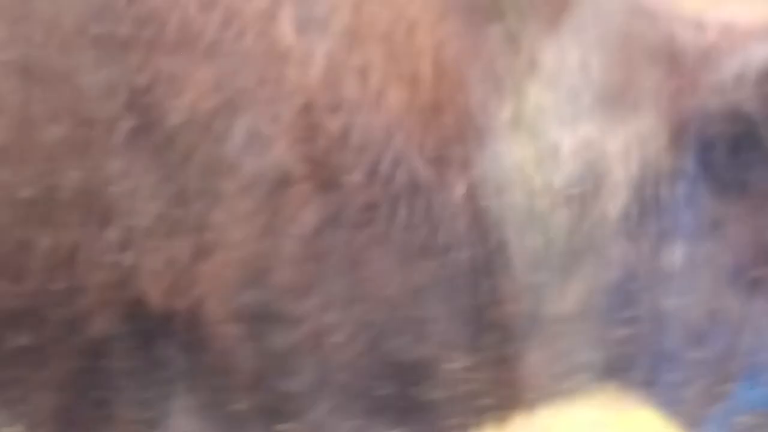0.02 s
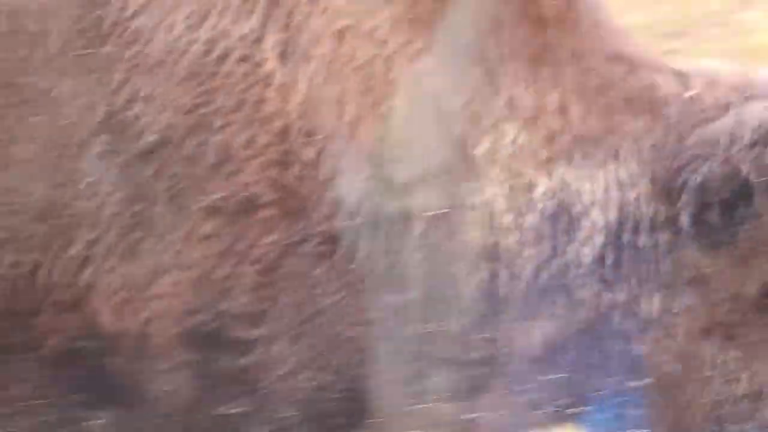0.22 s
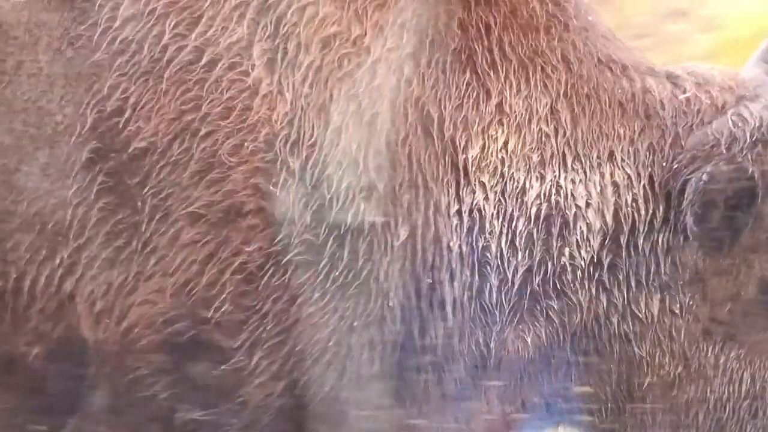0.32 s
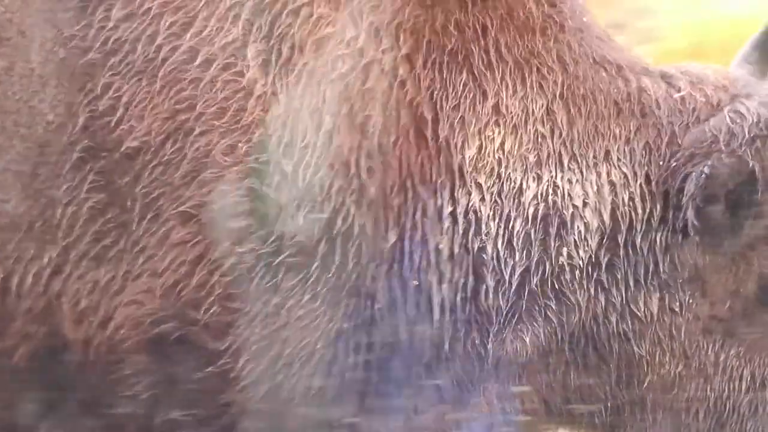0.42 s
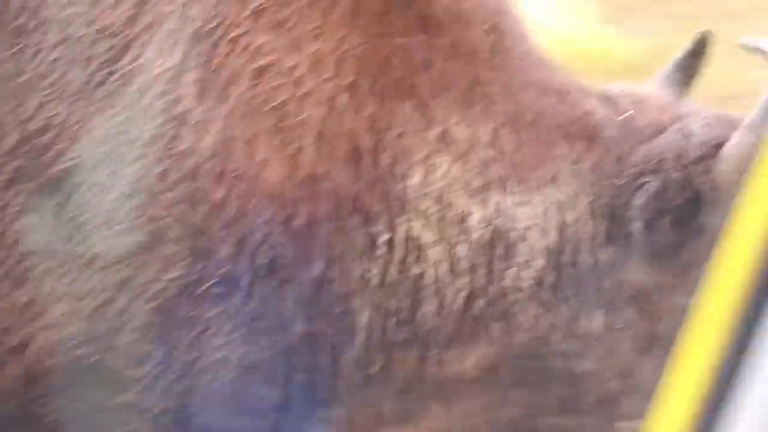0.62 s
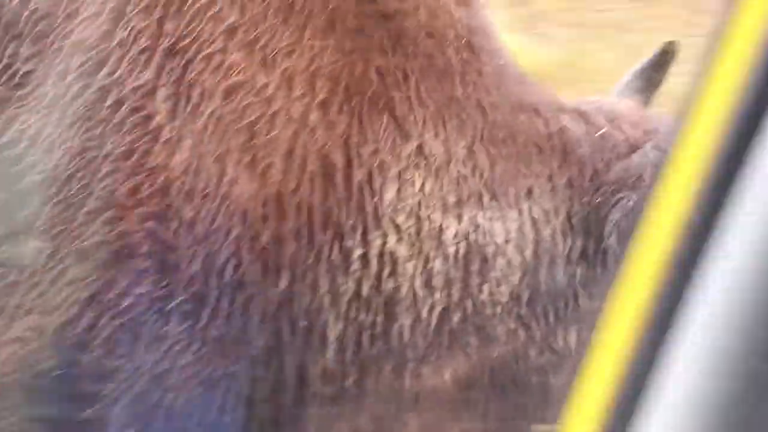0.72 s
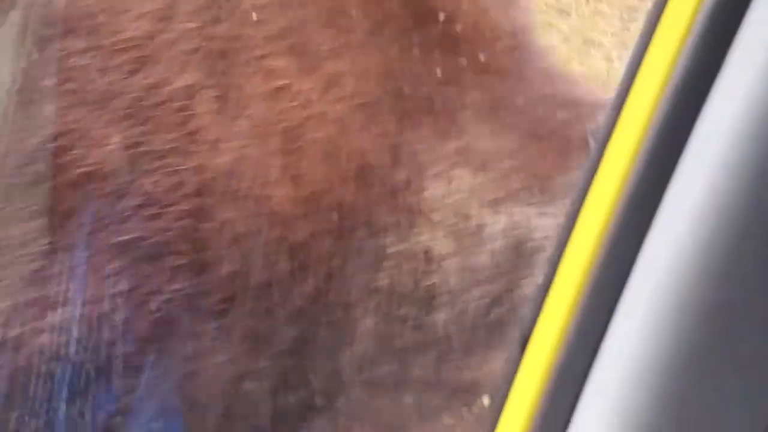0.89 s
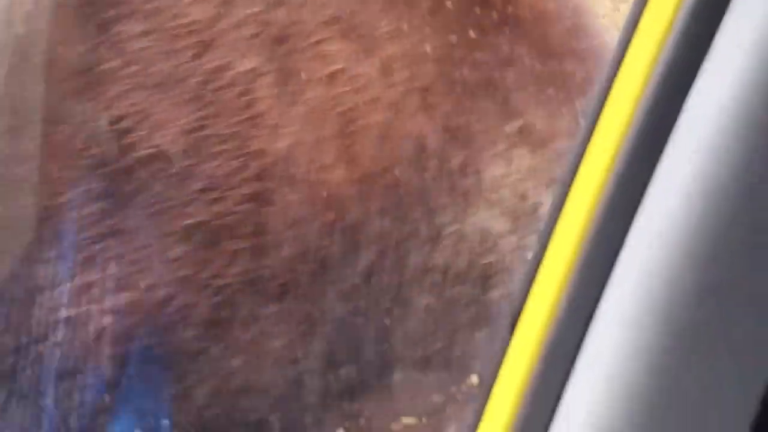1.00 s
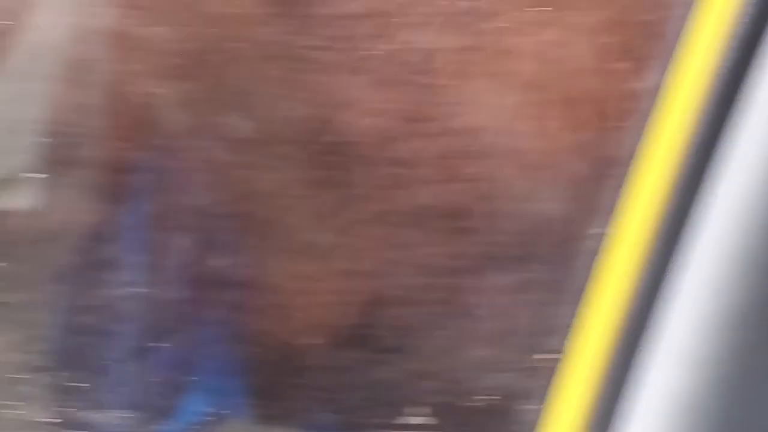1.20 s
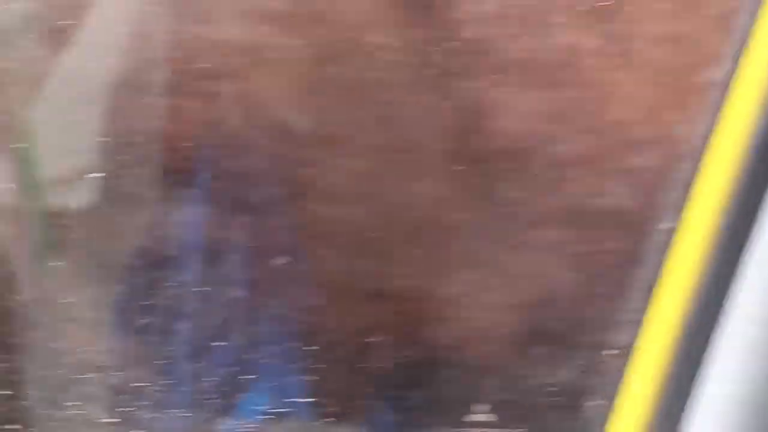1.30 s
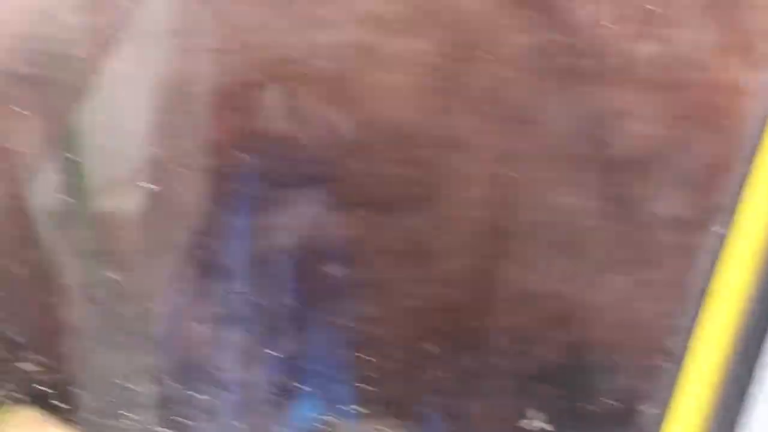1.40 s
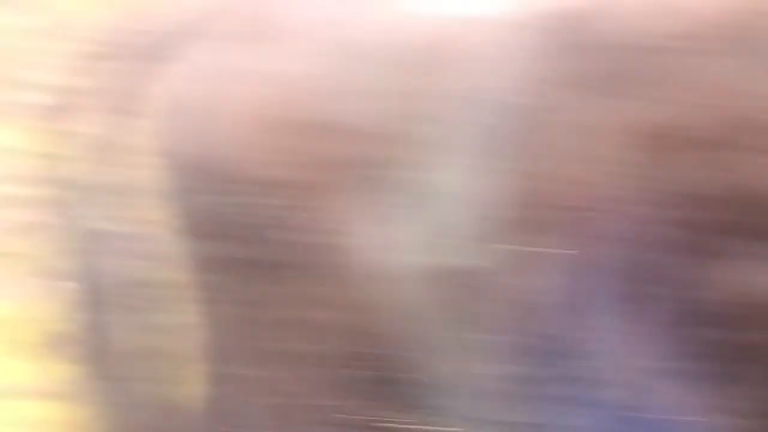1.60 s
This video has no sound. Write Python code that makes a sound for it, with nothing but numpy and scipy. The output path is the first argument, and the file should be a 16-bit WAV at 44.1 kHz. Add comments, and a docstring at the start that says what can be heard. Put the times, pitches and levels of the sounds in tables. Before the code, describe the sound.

A bison bumps a car door, heard close from inside the quiet cabin: a light knock with brief fur rubbing, then one hard, boomy thud with clacking trim and a quick rebound, fading into faint handling noise.

```python
"""A bison leans on a car door, close on the right of a stereo microphone in the cabin: one light bump, then
a hard one with a rebound. Struck panel modes, narrow cavity noise and a deep boom make each thud.
Bursts of coloured noise and struck modes make the fittings clack; slow modes leave the bodywork humming.
Before and between the bumps the coat rubs the panel as uneven noise. Behind lie trim scuffs,
dry ticks, soft handling thumps, quiet hiss, a thin whine and a rumble that swells and sinks."""
import sys
import numpy as np
from scipy import signal
from scipy.fft import rfft, irfft, next_fast_len
from scipy.io import wavfile
from scipy.ndimage import map_coordinates

SR = 44100
rng = np.random.default_rng(int(sys.argv[2]) if len(sys.argv) > 2 else 0)


def file_out(sig):
    """Save sig as 16-bit WAV at sys.argv[1]."""
    # one column per channel
    cols = np.atleast_2d(sig).T
    # limit, then scale
    lim = np.clip(cols, -1, 1)
    pcm = np.round(lim * 32767).astype(np.int16)
    wavfile.write(sys.argv[1], SR, pcm)


N = 74970

# Colour of the cabin hiss. Each row: frequency in Hz, relative level in dB.
HISS_COLOUR = [(120, -23), (270, -6), (400, -10.5), (580, -15), (780, -13.5), (1500, -13.5), (3200, -19),
               (5300, -19), (6600, -13.5), (8500, -21.5), (11000, -20.5), (16000, -20)]
# Colour of the low rumble. Each row: frequency in Hz, relative level in dB.
RUMBLE_COLOUR = [(20, -18), (45, 3.5), (70, 1), (110, -4), (170, -1.5), (260, -15.5), (500, -33.5),
                 (1500, -58)]
# Swell of the rumble as the car rocks. Each row: time in seconds, level in dB.
RUMBLE_SWELL = [(0, -63.5), (.3, -66), (.52, -44.5), (.75, -54), (1.1, -61.5), (1.7, -58.5)]
HISS_DB, HISS_ALIKE = -61, 0.13
WHINE_HZ, WHINE_HALF_WIDTH_HZ, WHINE_DB, WHINE_HAZE_DB = 14140, 70, -66.5, -73

# Short scuffs and creaks of trim. Each row: start in seconds, level in dB, t60 in seconds,
# left-over-right difference in dB.
TRIM_SCUFFS = [(0.087, -49.5, .04, 1.5), (.285, -53.5, .08, -3), (.358, -46.5, .2, 2), (.388, -37, .05, 14),
               (0.628, -49, 0.18, 0), (.709, -49, 0.066, -3), (0.719, -49, 0.112, 5), (.76, -56, .12, 5),
               (.898, -52.5, 0.059, 5)]
# Colour of the scuffs. Each row: frequency in Hz, relative level in dB.
TRIM_COLOUR = [(300, -12), (2500, -10), (4500, -8.5), (6000, -2.5), (7400, -3), (9000, -9), (16000, -19.5)]
# Dry handling ticks. Each row: start in seconds, level in dB, t60 in seconds, frequency in Hz above
# which the tick is dull.
HANDLING_TICKS = [(.0614, -51.5, 0.019, 1780), (0.5149, -53.5, 0.084, 2520), (.605, -50.5, 0.029, 5010),
                  (1.0434, -53.5, 0.0105, 800), (1.2283, -49, 0.0075, 1190), (1.575, -65, 0.14, 1980)]
# Soft handling thumps. Each row: start in seconds, level in dB, frequency in Hz.
HANDLING_THUMPS = [(0.056, -47, 187), (.688, -42.5, 269), (1.035, -46, 186), (1.582, -41.5, 156),
                   (1.678, -38.5, 91)]
TICK_LOW_HZ = 148  # ticks are thin below this
THUMP_ATTACK_S, THUMP_T60_S = 0.0047, 0.1

# Loudness of the coat on the door. Each row: time in seconds, level in dB.
RUB_LEVEL = [(0, -62), (.13, -64.5), (.16, -46.5), (.187, -43), (.2, -38.5), (.25, -34.5), (.29, -41.5),
             (.325, -38), (.355, -47), (.395, -44.5), (.45, -62), (.55, -75.5)]
# Colour of the coat on the door. Each row: frequency in Hz, relative level in dB.
COAT_COLOUR = [(40, -19.5), (130, 1.5), (200, -2), (290, -8), (390, -12.5), (480, 0), (570, -8.5),
               (700, -15), (900, -13), (1900, -17.5), (3000, -30), (6800, -31.5), (9000, -39), (16000, -45)]
RUB_SLIP_HZ, RUB_ROUGH_DB = 138.4, 1.5

# The contacts that make up the bumps. Each row: start in seconds, thud level in dB, panel pitch ratio,
# boom in dB, hollow tone in dB, low, mid and treble clack in dB, clack hold in seconds, clack t60 ratio.
CONTACTS = [(0.194, -30.5, .92, -68.5, -35.5, -41, -49, -60, .003, 0.42),
            (0.1998, -27, .92, -57.5, -40.5, -40, -47, -45, 0.0067, 0.37),
            (0.2285, -14.5, 0.94, -40.5, -20, -31.5, -25, -28.5, .006, 0.55),
            (0.312, -44.5, .90, -53.5, -30, -41.5, -42, -40, .006, .8),
            (0.4017, -1, 1, -17.5, -27, -20.5, -16, -13.5, 0.0044, 0.96),
            (0.429, -28, 0.91, -46, -30, -23.5, -21, -17.5, 0.0099, 0.52),
            (0.4347, -12.5, 0.93, -43, -34, -29, -30.5, -22, .004, 1.19)]

# Long hum of the bodywork. Each row: frequency in Hz before HUM_PITCH, level in dB against the thud,
# t60 in seconds.
BODYWORK_MODES = [(112, -35, 2.4), (140, -34, 1.9), (164, -40, 2.2), (264, -47, .9), (368, -55, 1.1)]
HUM_PITCH, HUM_ATTACK_S, HUM_WAVER_DB, HUM_WAVER_HZ = 0.96, 0.022, 5, 10

# Colour of the clack at the left microphone. Each row: frequency in Hz, relative level in dB.
CLACK_COLOUR_LEFT = [(100, -23), (300, 5.5), (600, -3), (830, -5), (1100, 0), (2200, -2.5), (2700, -4.5),
                     (4000, 2), (5400, -3.5), (6500, 6), (7500, -1), (9300, -12), (11500, -14.5),
                     (16000, -18)]
# Colour of the clack at the right microphone. Each row: frequency in Hz, relative level in dB.
CLACK_COLOUR_RIGHT = [(100, -34.5), (300, -5.5), (560, 7), (1050, -6), (1600, 2), (2200, 7.5), (3100, -5.5),
                      (5400, -7.5), (6800, -9.5), (9300, -14), (11500, -9.5), (16000, -18)]
# Edges between the low, mid and treble clack: low edge in Hz, high edge in Hz.
CLACK_EDGES = (770, 3000)
# Decay of the low, mid and treble clack, both times before the contact's t60 ratio. Each row:
# t60 in seconds, cabin tail in dB, tail t60 in seconds.
CLACK_FADES = [(0.045, -19.5, 0.31), (.04, -15.5, 0.3), (0.069, -8.5, 0.17)]
# Ringing of the fittings. Each row: frequency in Hz before FITTINGS_PITCH, level in dB against the
# mid clack, t60 in seconds.
FITTING_MODES = [(1909, -12, .14), (2095, -10, .1), (2237, -10, .1), (2400, -10, .1)]
FITTINGS_PITCH, CLACK_ATTACK_S, CLACK_ALIKE = 0.91, 0.0004, 0.15
# dry crack at the onset of every contact, level against the treble clack
CRACK_DB, CRACK_T60_S = 0, 0.007
# metal ringing on, level against the treble clack
ZING_HZ, ZING_HALF_WIDTH_HZ, ZING_DB, ZING_T60_S = 6564, 600, -34, 0.65

# Door panel modes. Each row: frequency in Hz before the panel pitch ratio, level in dB against the thud,
# t60 in seconds.
PANEL_MODES = [(112, -22, .25), (150, 0, .105), (184, -7, .1), (228, -19, .13), (293, -6, .11),
               (322, -11, .09), (366, -10, .1), (512, -20, .12), (549, -17, .12), (841, -20, .12)]
# Deep boom of the cabin air. Each row: frequency in Hz, level in dB against the boom, t60 in seconds.
BOOM_MODES = [(45, 0, .36), (65, -3, .27)]
THUD_ATTACK_S, BOOM_ATTACK_S = 0.0038, 0.025
HOLLOW_HZ, HOLLOW_HALF_WIDTH_HZ, HOLLOW_T60_S = 483, 46, 0.1  # the door's cavity

LEFT_LAG_S = 0.0003  # the door is on the right
LOW_CUT_HZ, TOP_HZ = 35, 16000


def amp(db):
    """Gain from a level in dB."""
    return 10 ** (np.asarray(db) / 20)


def unit(x):
    """x scaled to an rms of 1."""
    return x / np.sqrt(np.mean(x ** 2) + 1e-20)


def colour(points):
    """Gain against frequency from (Hz, dB) points on a log axis."""
    f, db = np.transpose(points)
    return lambda hz: amp(np.interp(np.log(hz + 1), np.log(f + 1), db))


def peak(centre_hz, half_width_hz):
    """Gain of one narrow resonance, halved at half_width_hz from its centre."""
    return lambda hz: 1 / (1 + ((hz - centre_hz) / half_width_hz) ** 2)


def filtered(x, response):
    """x times a response of frequency."""
    m = next_fast_len(N + SR // 2)
    spectrum = rfft(x, m) * response(np.fft.rfftfreq(m, 1 / SR))
    return irfft(spectrum, m)[..., :N]


def noise(response, alike):
    """Coloured stereo noise of rms 1; alike is the likeness of the two sides."""
    shared, apart = rng.standard_normal((2, N))
    angle = np.arccos(np.clip(alike, -1, 1)) / 2
    sides = np.cos(angle) * shared + np.sin(angle) * np.array([apart, -apart])
    return unit(filtered(sides, response))


def since(s):
    """Seconds after s, zero before."""
    return np.maximum(np.arange(N) / SR - s, 0)


def decay(t, t60):
    """Exponential fall of 60 dB in t60 seconds."""
    return np.exp(-np.log(1000) * t / t60)


def envelope(s, attack_s, hold_s, t60):
    """Attack at s, hold and exponential release."""
    return (1 - np.exp(-since(s) / attack_s)) * decay(since(s + hold_s), t60)


def level(points):
    """Gain per sample from (s, dB) points."""
    return amp(np.interp(np.arange(N) / SR, *np.transpose(points)))


def pan(db):
    """Left and right gains for a left-over-right difference in dB."""
    return amp(np.array([[db], [-db]]) / 2)


def wobble(rate_hz):
    """A random curve through rate_hz new values a second, joined by straight lines."""
    return map_coordinates(rng.standard_normal(N), [np.arange(N) * rate_hz / SR], order=1)


def ring(s, modes, ratio, attack_s):
    """Damped modes struck at s, their frequencies multiplied by ratio."""
    t = since(s)
    tones = np.zeros(N)
    for hz, db, t60 in modes:
        tones += amp(db) * decay(t, t60) * np.sin(2 * np.pi * hz * ratio * t)
    return (1 - np.exp(-t / attack_s)) * tones


def cabin():
    """Quiet hiss, a thin electronic whine in a narrow haze, and a rumble that swells while the car rocks."""
    hiss = amp(HISS_DB) * noise(colour(HISS_COLOUR), HISS_ALIKE)
    whine = amp(WHINE_DB) * np.sin(2 * np.pi * WHINE_HZ * since(0))
    haze = amp(WHINE_HAZE_DB) * noise(peak(WHINE_HZ, WHINE_HALF_WIDTH_HZ), alike=0.6)
    rumble = level(RUMBLE_SWELL) * noise(colour(RUMBLE_COLOUR), alike=0.7)
    return hiss + whine + haze + pan(db=-3.0) * rumble


def trim_scuffs():
    """Trim rubs and creaks: short fading bursts of coloured noise, each at its own place."""
    out = np.zeros((2, N))
    for s, db, t60, side_db in TRIM_SCUFFS:
        burst = envelope(s, 0.0011, 0.001, t60) * noise(colour(TRIM_COLOUR), alike=0.2)
        out += amp(db) * pan(side_db) * burst
    return out


def handling_ticks():
    """Handling ticks: sharp noise bursts thinned in the bass and dulled on top, well to the right."""
    out = np.zeros((2, N))
    for s, db, t60, dull_hz in HANDLING_TICKS:
        dull = lambda hz: hz / (hz + TICK_LOW_HZ) / (1 + (hz / dull_hz) ** 2)
        out += amp(db) * envelope(s, 0.0001, 0.000466, t60) * noise(dull, alike=0.34)
    return pan(db=-10.5) * out


def handling_thumps():
    """Handling thumps: one softly struck, quickly damped low mode each, in the middle."""
    return sum(ring(s, [(hz, db, THUMP_T60_S)], 1, THUMP_ATTACK_S) for s, db, hz in HANDLING_THUMPS)


def coat():
    """Fur drags over the panel in uneven slips: coloured noise with a fast random roughness."""
    slips = amp(RUB_ROUGH_DB * wobble(RUB_SLIP_HZ))
    rub = unit(slips * noise(colour(COAT_COLOUR), alike=0.67))
    return pan(db=-4) * level(RUB_LEVEL) * rub


def bodywork():
    """The bumps leave the car's shell humming in slow modes; each tone wavers as it fades."""
    hum = np.zeros(N)
    for mode in BODYWORK_MODES:
        tone = sum(amp(db) * ring(s, [mode], HUM_PITCH, HUM_ATTACK_S) for s, db, *_ in CONTACTS)
        hum += tone * amp(HUM_WAVER_DB * wobble(HUM_WAVER_HZ))
    return pan(db=-2.3) * hum


def clack_bands():
    """Power shares of the low, mid and treble clack against frequency."""
    low_hz, high_hz = CLACK_EDGES
    under = lambda hz, edge_hz: 1 / (1 + (hz / edge_hz) ** 8)
    low = lambda hz: under(hz, low_hz)
    mid = lambda hz: under(hz, high_hz) - under(hz, low_hz)
    treble = lambda hz: 1 - under(hz, high_hz)
    return [low, mid, treble]


def clacks():
    """Loose fittings crack, chatter for milliseconds and ring, then die away in the small cabin."""
    ears = lambda hz: np.array([colour(CLACK_COLOUR_LEFT)(hz), colour(CLACK_COLOUR_RIGHT)(hz)])
    bands = clack_bands()
    chatter = np.zeros((len(bands), N))
    crack, zing, fittings = np.zeros(N), np.zeros(N), np.zeros(N)
    for s, *_, low_db, mid_db, treble_db, hold_s, length in CONTACTS:
        fade = lambda t60: envelope(s, CLACK_ATTACK_S, hold_s, length * t60)
        shapes = []
        for db, (t60, tail_db, tail_t60) in zip((low_db, mid_db, treble_db), CLACK_FADES):
            shapes.append(amp(db) * np.hypot(fade(t60), amp(tail_db) * fade(tail_t60)))
        chatter = np.hypot(chatter, shapes)  # overlapping noises add in power
        crack += amp(treble_db + CRACK_DB) * envelope(s, 0.0001, 0.00067, CRACK_T60_S)
        zing = np.hypot(zing, amp(treble_db + ZING_DB) * envelope(s, CLACK_ATTACK_S, 0, ZING_T60_S))
        fittings += amp(mid_db) * ring(s, FITTING_MODES, FITTINGS_PITCH, CLACK_ATTACK_S)
    out = pan(db=-3.5) * fittings
    for shape, band in zip(chatter, bands):
        out += shape * noise(lambda hz: ears(hz) * np.sqrt(np.abs(band(hz))), CLACK_ALIKE)
    out += crack * noise(ears, CLACK_ALIKE)
    return out + zing * noise(peak(ZING_HZ, ZING_HALF_WIDTH_HZ), CLACK_ALIKE)


def thuds():
    """Each contact strikes the panel's modes, excites its hollow cavity and booms in the cabin air."""
    panel, cavity = np.zeros(N), np.zeros(N)
    for s, db, ratio, boom_db, hollow_db, *_ in CONTACTS:
        panel += amp(db) * ring(s, PANEL_MODES, ratio, THUD_ATTACK_S)
        panel += amp(boom_db) * ring(s, BOOM_MODES, 1, BOOM_ATTACK_S)
        cavity += amp(hollow_db) * envelope(s, THUD_ATTACK_S, 0, HOLLOW_T60_S)
    hollow = cavity * noise(peak(HOLLOW_HZ, HOLLOW_HALF_WIDTH_HZ), alike=0.72)
    return pan(db=-1.5) * panel + pan(db=-3.5) * hollow


def from_the_right(x):
    """Sound from the right reaches the left microphone later: half the lag is put on each side."""
    sides = np.array([[1], [-1]])
    return filtered(x, lambda hz: np.exp(-1j * np.pi * hz * LEFT_LAG_S * sides))


def scene():
    """The cabin behind, small sounds over it, and the door on the right in front."""
    small_sounds = trim_scuffs() + handling_ticks() + handling_thumps()
    door = from_the_right(coat() + bodywork() + thuds())
    return cabin() + small_sounds + clacks() + door


def record(dry):
    """The recorder thins the deepest bass, rounds off the highest peaks and keeps nothing above TOP_HZ."""
    low_cut = signal.butter(2, LOW_CUT_HZ, "highpass", fs=SR, output="sos")
    thin = signal.sosfilt(low_cut, dry)
    rounded = thin / (1 + np.abs(thin) ** 6) ** (1 / 6)
    return filtered(rounded, lambda hz: hz < TOP_HZ)


dry = scene()
out = record(dry)
file_out(out)
```